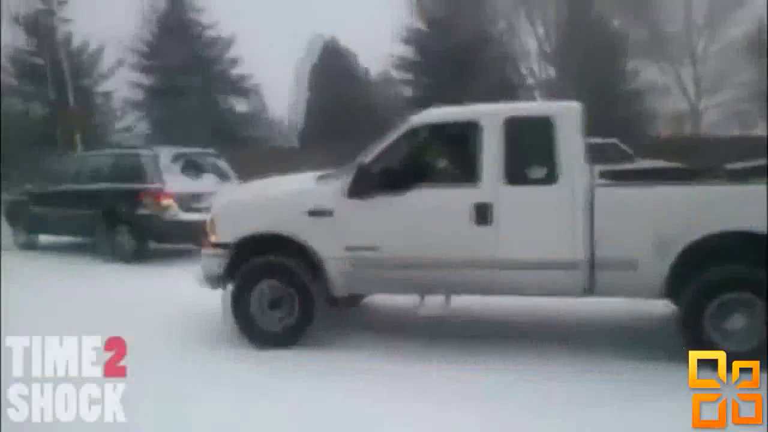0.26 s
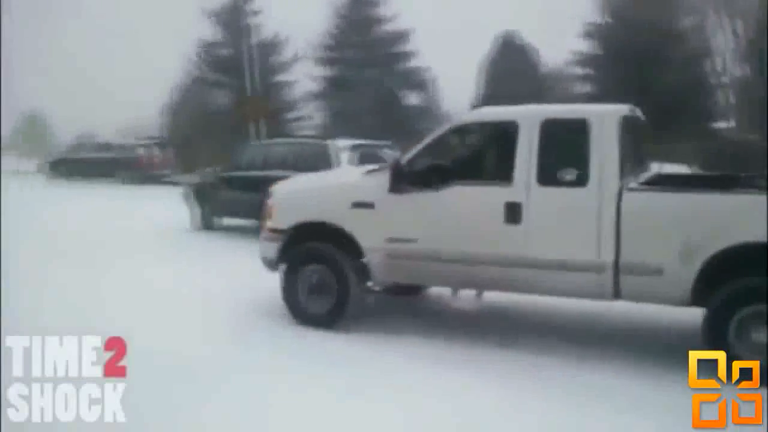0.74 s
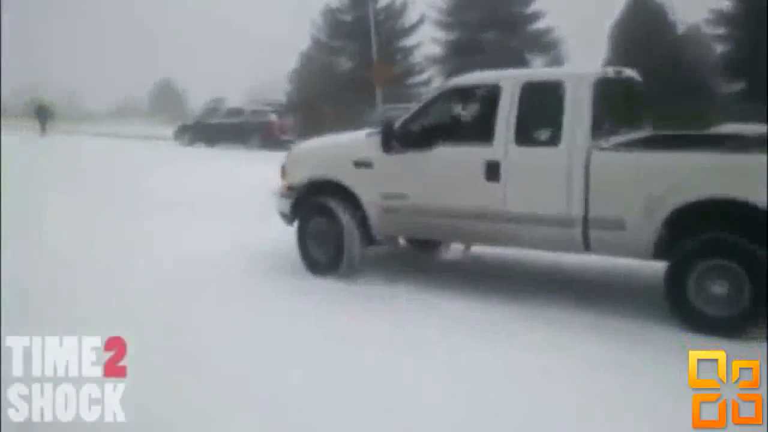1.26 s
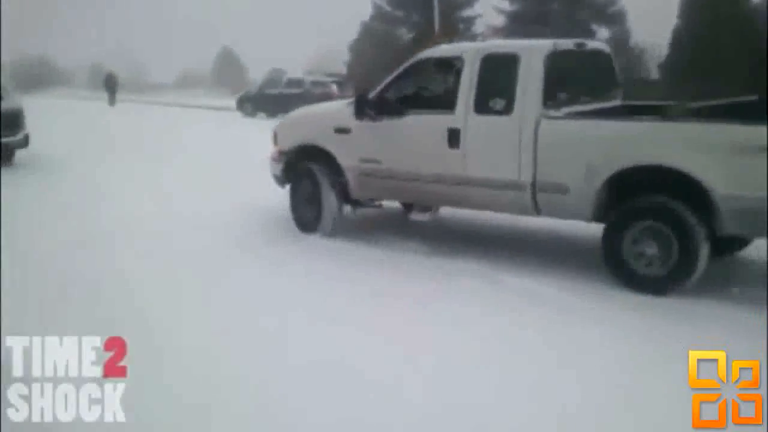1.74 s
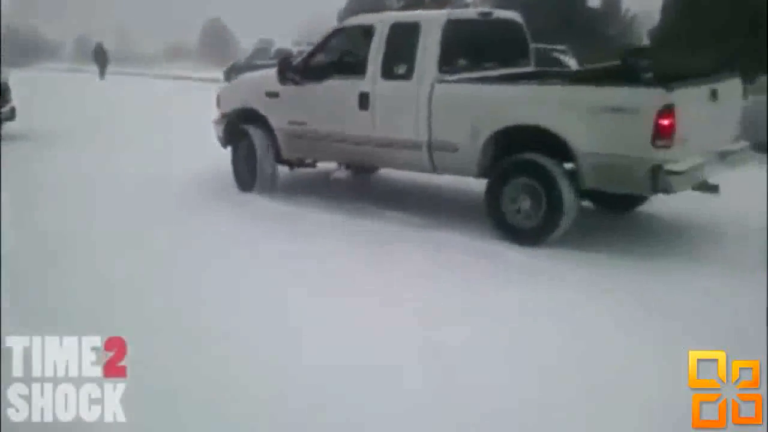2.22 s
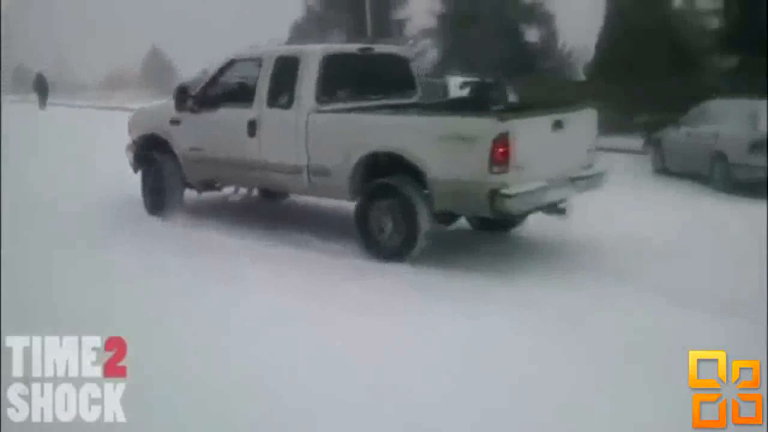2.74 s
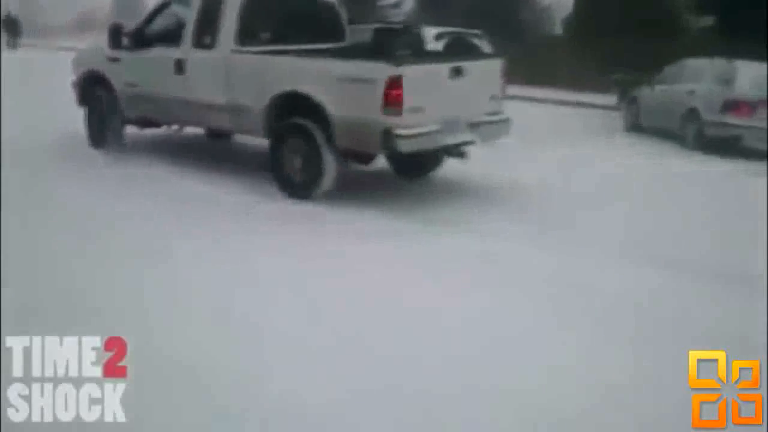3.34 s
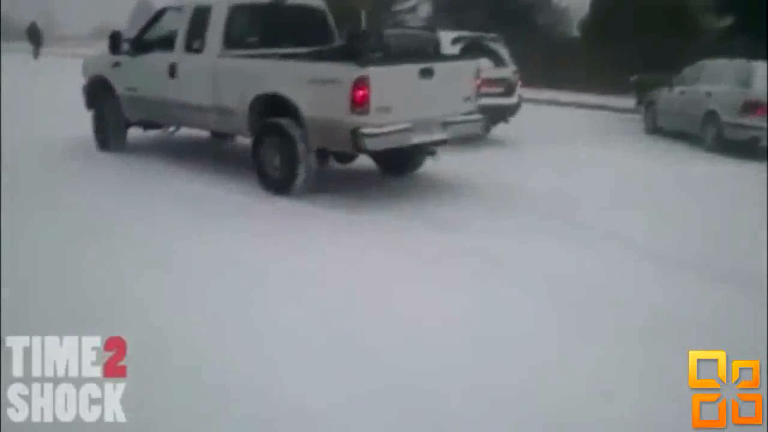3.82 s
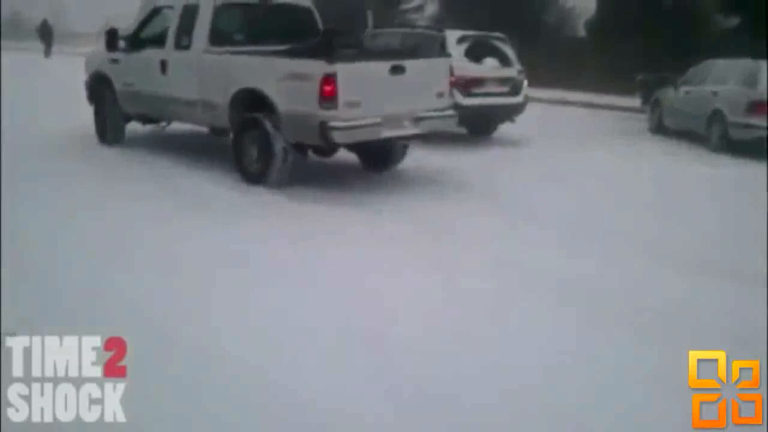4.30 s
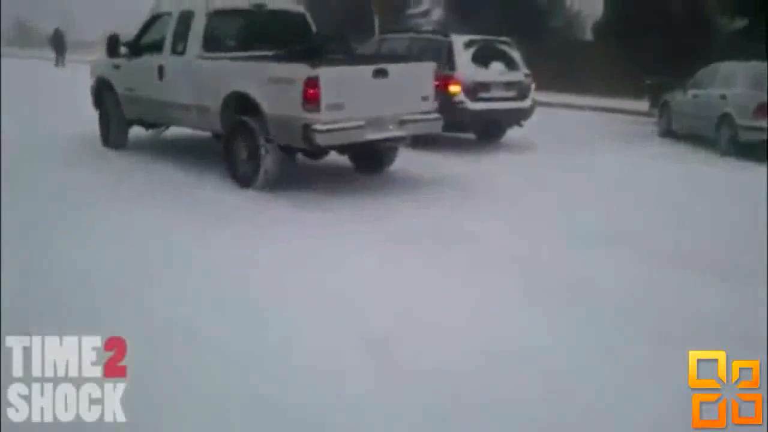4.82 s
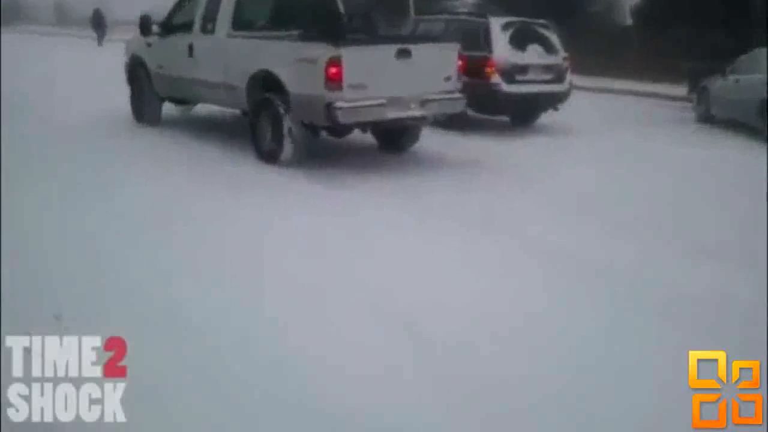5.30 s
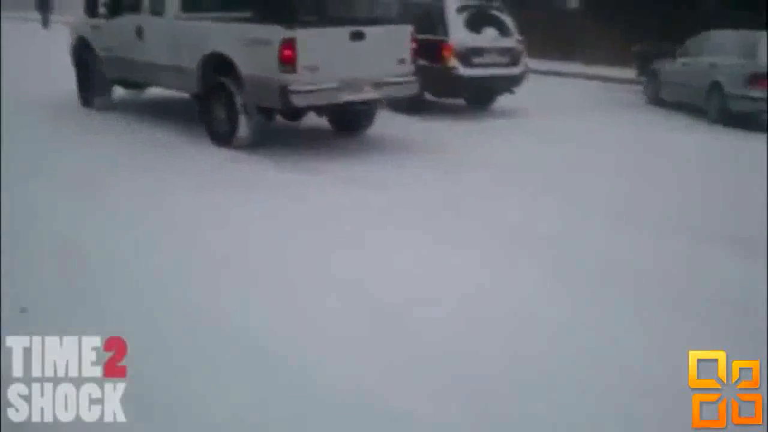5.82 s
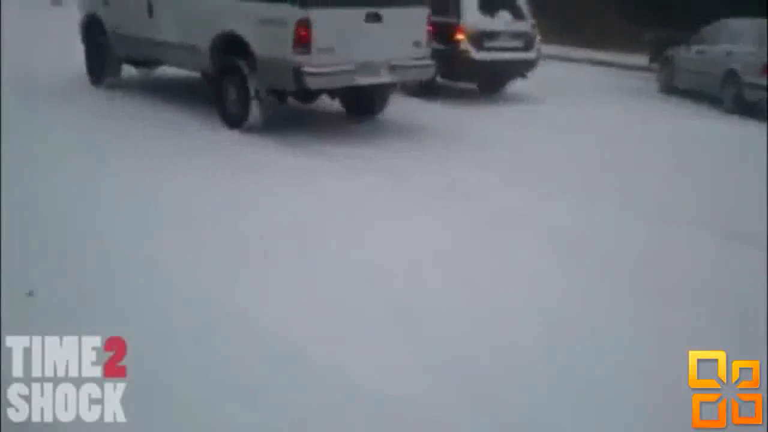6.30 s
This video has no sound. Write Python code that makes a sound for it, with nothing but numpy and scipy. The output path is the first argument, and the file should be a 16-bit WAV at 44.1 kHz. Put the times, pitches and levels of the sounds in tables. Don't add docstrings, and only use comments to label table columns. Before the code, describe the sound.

Outdoors on a snowy street, a diesel pickup clatters close by from the first half second, with a low exhaust hum and thin belt whine. Wind soon thumps and crackles on the small handheld microphone, heaviest around one and a half to two and a half seconds. The engine revs with a turbo whistle near three seconds, eases, then revs once more as the wind dies. Tyres crunch softly and another engine idles behind.

```python
import sys
import numpy as np
from scipy import signal
from scipy.fft import rfft, irfft, next_fast_len
from scipy.io import wavfile
from scipy.ndimage import uniform_filter1d, map_coordinates

SR = 44100
rng = np.random.default_rng(int(sys.argv[2]) if len(sys.argv) > 2 else 0)


def master_out(mix):
    frames = np.transpose(np.atleast_2d(mix))
    ceiling = np.clip(frames, -1, 1)
    pcm = np.round(ceiling * 32767).astype(np.int16)
    wavfile.write(sys.argv[1], SR, pcm)


def boost_factor(decibels):
    exponent = np.asarray(decibels, float) / 20
    return 10 ** exponent


N = 288855
TIME = np.arange(N) / SR
MID_LOAD_DB = -32


def unit(x):
    return x / np.sqrt(np.mean(x ** 2) + 1e-20)


def along(points, hz):
    f, v = np.transpose(points)
    return np.interp(np.log(hz + 1), np.log(f + 1), v)


def curves(rows):
    s, *cols = np.transpose(rows)
    return [np.interp(TIME, s, c) for c in cols]


def wobble(rate):
    knots = rng.standard_normal(int(N * rate / SR) + 4)
    return map_coordinates(knots, [np.arange(N) * rate / SR])


def filtered(x, response):
    m = next_fast_len(N + 8192)
    return irfft(rfft(x, m) * response(np.fft.rfftfreq(m, 1 / SR)), m)[:N]


def noise(spectrum):
    return unit(filtered(rng.standard_normal(N), lambda hz: boost_factor(along(spectrum, hz))))


def resonant(x, modes):
    def response(f):
        total = 0
        for k, (centre, width, db) in enumerate(modes):
            damping = 1j * f * width
            total = total + (-1) ** k * boost_factor(db) * damping / (centre * centre - f * f + damping)
        return total
    return unit(filtered(x, response))


def smooth_field(shape, tall, long):
    field = uniform_filter1d(rng.standard_normal(shape), size=tall, axis=0)
    return unit(uniform_filter1d(field, size=long, axis=1))


def patchy(x, patchy_db, streak_db):
    z = signal.stft(x, nperseg=1024)[2]
    gain_db = patchy_db * smooth_field(z.shape, tall=10, long=5)
    gain_db = gain_db + streak_db * smooth_field(z.shape, tall=2, long=24)
    return unit(signal.istft(z * boost_factor(gain_db), nperseg=1024)[1][:N])


def even(x, span=0.0079):
    power = np.abs(uniform_filter1d(x ** 2, int(span * SR)))
    return unit(x / np.sqrt(power + 0.07))


# (time [s], level [dB])
LOAD = [(.53, -28.5), (.8, -27.5), (1.38, -28.5), (1.8, -36.5), (2.46, -32.5), (2.76, -27), (3.13, -27.5),
        (3.2, -33), (3.56, -37.5), (4.09, -33), (4.55, -39.5), (5.05, -34), (5.28, -27.5), (5.66, -26.5),
        (5.75, -33.5), (6.3, -40.5), (6.46, -37.5), (6.55, -40.5)]
# (time [s], side [0 grille, 1 flank, 2 tail])
TURN = [(.5, 0.6), (1.15, 0.39), (1.5, 0.55), (1.9, 0.8), (2.4, 1), (2.7, 1.2), (2.95, 1.3), (3.2, 1.5),
        (3.35, 1.18), (5.12, 1.12), (5.3, 2.08), (6.55, 1.79)]


def law(base_db, per_load_db, per_turn_db):
    return base_db + per_load_db * (curves(LOAD)[0] - MID_LOAD_DB) + per_turn_db * curves(TURN)[0]


# (frequency [Hz], density [dB per Hz])
RUMBLE = [(20, -43.5), (45, -4.5), (80, -2.5), (130, 3.5), (165, -4.5), (220, -3), (290, -14), (400, -53)]


def rumble():
    away_db_per_s = 0.17
    return boost_factor(law(-41.5, 0.22, -0.3) - away_db_per_s * TIME + 1.0) * noise(RUMBLE)


# (frequency [Hz], width [Hz], level [dB])
DRONES = [(220.5, 14, -5), (435, 12, 1), (500, 12, -1), (560, 14, -3), (629, 14, -5)]


def drones():
    level_db, swing_db = -53, 4
    out = np.zeros(N)
    for mode in DRONES:
        swell = boost_factor(level_db + mode[2] + swing_db * wobble(2.993))
        out += swell * resonant(rng.standard_normal(N), [mode])
    return out


# (time [s], frequency [Hz], level [dB])
IDLER = [(.5, 132.3, -48), (4.58, 124, -62.5), (4.66, 126.8, -39.5), (4.86, 133.1, -40), (4.93, 132.6, -53),
         (5.3, 129.7, -62), (5.75, 132.3, -62), (5.95, 131.9, -39.5), (6.2, 133, -52), (6.4, 125.5, -42),
         (6.55, 129, -31.5)]


def idling_engine():
    hz, db = curves(IDLER)
    phase = 2 * np.pi * np.cumsum(hz * (1 + 0.009 * wobble(7.5))) / SR
    return boost_factor(db - 2.0 + 1.9 * wobble(9.7)) * np.sin(phase)


# (frequency [Hz], density [dB per Hz])
CRUNCH = [(250, -21), (340, 0), (450, -1), (540, -1.5), (700, -8), (830, -5.5), (1000, 0.5), (1400, -40)]


def tyres():
    return boost_factor(law(-40.5, 0.81, -0.42)) * patchy(noise(CRUNCH), patchy_db=0.6, streak_db=1.7)


# (time [s], level [dB])
GUSTS = [(0.551, -43), (.85, -34), (1.2, -43.5), (1.3, -34.5), (1.4, -28), (1.7, -29.5), (1.95, -33),
         (2.03, -32.5), (2.1, -24.5), (2.4, -31), (2.44, -39.5), (2.65, -31), (3.15, -42), (3.5, -43),
         (3.82, -43.5), (4, -34), (4.3, -42.5), (4.75, -78)]
# (centre [s], level [dB], length [s], sharpness [dB])
PUFFS = [(.888, -15.5, 0.0044, -11), (.925, -23.5, .03, -12.5), (1.075, -21.5, 0.043, -9),
         (1.135, -24.5, 0.065, -8), (1.368, -22.5, 0.039, 1), (1.412, -23, 0.018, 0.5),
         (1.325, -26, 0.033, -5), (1.62, -27.5, 0.039, 3), (1.69, -24, 0.017, -6), (1.76, -24, 0.022, -11),
         (1.782, -24, .012, -9.5), (1.86, -22.5, 0.035, -9), (1.905, -23.5, 0.038, -6.5),
         (1.94, -22, 0.021, -16), (2.012, -26, 0.0078, -0.5), (2.16, -19.5, 0.016, -8),
         (2.24, -25, 0.031, -14.5), (2.67, -26, 0.018, -5), (1.465, -21, 0.11, 2.5), (1.55, -22.5, 0.02, 0),
         (1.59, -24.5, .016, 6), (1.665, -21.5, 0.03, -3.5), (1.712, -22.5, 0.03, -9),
         (2.078, -17.5, .022, 0.5), (2.135, -23, 0.044, -1.5), (2.198, -23, 0.02, 1),
         (2.283, -20.5, 0.045, 0), (2.34, -18, 0.026, -6.5), (2.408, -22, 0.028, 2),
         (2.525, -17, 0.043, -9.5), (2.62, -22.5, 0.062, -13.5), (2.824, -22.5, 0.03, -5),
         (3.03, -27, .016, -14), (3.105, -30, .04, -10.5), (3.205, -30, 0.036, -12),
         (3.33, -22, 0.018, -19), (3.418, -27, 0.018, -16), (3.58, -29, .02, -20),
         (3.75, -27.5, .015, -9.5), (4.026, -26, 0.0091, -4), (4.205, -27, 0.017, -15),
         (3.308, -17.5, 0.022, -15), (3.345, -17.5, 0.02, -22.5), (3.558, -21, 0.013, -19.5),
         (3.635, -22, 0.035, -20), (3.725, -25, 0.04, -20.5), (3.872, -17.5, 0.027, -12),
         (3.985, -20, 0.085, -7), (4.097, -25, 0.014, 3.5), (4.55, -28, 0.012, -25.5)]


def eddies():
    rate, over_wind_db, length_s = 55, -1, 0.009
    sharp_db, scatter_db = -8.5, 1.5
    s, strength_db = np.transpose(GUSTS)
    count = int(rate * (s[-1] - s[0]))
    chance = rng.standard_normal((count, 4))
    when = s[0] + (np.arange(count) + .5 + 0.33 * chance[:, 0]) / rate
    level_db = np.interp(when, s, strength_db) + over_wind_db + scatter_db * chance[:, 1]
    lengths = length_s * np.exp(.5 * chance[:, 2])
    return PUFFS + list(zip(when, level_db, lengths, sharp_db + scatter_db * chance[:, 3]))


# (frequency [Hz], density [dB per Hz])
FLUTTER = [(30, -24), (60, -6.5), (150, 10.5), (300, 4), (450, -7.5), (800, -15.5), (1500, -68.5)]
SHARP = [(150, -22), (350, 2.5), (520, -2.5), (800, -9.5), (1100, -19), (1500, -26.5), (2500, -47)]
THUD = [(20, -33), (40, -9.5), (70, 2), (110, -8.5), (150, 4), (300, -52.5)]


def wind():
    flutter_db, = curves(GUSTS)
    thud_db = -42 + 0.3 * (flutter_db - MID_LOAD_DB) + 3 * wobble(7.4)
    calm = np.clip((GUSTS[-1][0] - TIME) / 0.34, 0, 1)
    dull, sharp = np.zeros(N), np.zeros(N)
    t = np.arange(-4000, 4000) / SR
    for s, db, length, sharp_db in eddies():
        bump = boost_factor(db) * np.exp(-(t / (0.48 * length)) ** 2)
        start = round(s * SR) - 4000
        dull[start:][:len(t)] += bump
        sharp[start:][:len(t)] += bump * boost_factor(sharp_db)
    torn = boost_factor(2 * wobble(170))
    dull, sharp = dull * torn, sharp * torn ** 0.79
    lumps_db = 2.2 * wobble(55)
    bed = boost_factor(flutter_db - 2.5 + lumps_db) * even(noise(FLUTTER))
    bed = bed + boost_factor(thud_db + 1.0) * even(noise(THUD), span=0.031)
    return calm * bed + boost_factor(-5.5) * dull * even(noise(FLUTTER)) + boost_factor(-4.5) * sharp * even(noise(SHARP))


# (time [s], peak [dB], frequency [Hz])
SNAPS = [(0.886, -12.5, 330), (0.93, -20, 530), (1.068, -14, 550), (1.083, -20, 200), (1.112, -13.5, 330),
         (1.365, -11.5, 498), (1.41, -11.5, 450), (1.432, -5, 483), (1.469, -2, 300), (1.7, -15, 296),
         (1.579, -16.5, 347), (2.069, -6, 455), (2.1135, -12.5, 550), (2.159, -13.5, 450),
         (2.084, -15, 300), (1.689, -18, 500), (3.93, -19, 350), (3.862, -18.5, 370), (2.197, -25, 290),
         (2.279, -13.5, 797), (2.283, -15, 248), (2.293, -12, 330), (2.337, -16.5, 240), (2.343, -9.5, 297),
         (2.397, -16, 280), (2.415, -18.5, 570), (2.7, -19.5, 280), (1.723, -16.5, 330),
         (1.588, -15.5, 440), (3.3, -20, 150), (3.984, -14, 250), (2.323, -16, 454), (2.313, -16.5, 310),
         (.916, -15.5, 270), (.955, -23.5, 280), (1.096, -18.5, 480), (1.152, -21.5, 300), (.619, -24, 220),
         (1.475, -12.5, 603), (1.45, -7.5, 503), (1.488, -11.5, 510), (2.535, -13, 310), (2.821, -19, 470),
         (2.878, -15.5, 290), (3.345, -24, 220), (3.877, -19.5, 550), (3.6, -18.5, 380),
         (3.968, -11.5, 550), (3.989, -11.5, 570), (4.157, -24, 450), (4.145, -21.5, 400)]


def snaps():
    out, t = np.zeros(N), np.arange(-300, 300) / SR
    for s, db, hz in SNAPS:
        swing = np.exp(-(2.5 * hz * t) ** 2) * np.cos(2 * np.pi * hz * t + .8)
        out[round((s + .0015) * SR) - 300:][:len(t)] += boost_factor(db + 2) * swing
    return out


# (time [s], peak [dB], frequency [Hz])
ICE = [(1.5003, -29.5, 7300), (1.748, -25.5, 6700), (1.9093, -30, 6900), (1.919, -32, 7200),
       (1.6925, -37, 6500), (1.784, -38, 6200), (3.6534, -31, 7150), (3.7524, -38.5, 7430),
       (3.8699, -35, 6570), (4.151, -29, 6950), (4.1781, -38.5, 6370), (4.2175, -39, 6250),
       (4.3502, -29, 7550), (4.5219, -36.5, 6000), (4.5946, -40, 7500), (4.6416, -34.5, 6770),
       (4.6768, -33.5, 7140), (4.721, -35, 5940), (5.3131, -27.5, 6550)]


def ice():
    ring_s = .0004
    out, t = np.zeros(N), np.arange(200) / SR
    for s, db, hz in ICE:
        tick = np.exp(-t / ring_s) * np.sin(2 * np.pi * hz * t)
        out[round((s + .0005) * SR):][:len(t)] += boost_factor(db) * tick
    return filtered(out, lambda hz: boost_factor(along([(1500, -25.0), (4500, 1), (7500, -0.5)], hz)))


# (time [s], level [dB])
BELT = [(.5, -40), (.8, -37), (1.4, -38.5), (1.8, -39), (2.05, -40), (2.3, -47), (3.1, -50), (3.35, -43),
        (3.55, -50), (4.05, -50), (4.2, -43.5), (4.45, -45), (4.7, -48), (5.1, -49), (5.6, -56),
        (6.55, -60)]


def pulley():
    start_hz, sag_hz_per_s, width_hz, drift = 1190, 10, 20, .004
    breath = noise([(1, 0), (width_hz / 2, -3), (width_hz * 2, -30)])
    hz = (start_hz - sag_hz_per_s * TIME) * (1 + drift * wobble(5))
    tone = unit(breath * np.sin(2 * np.pi * np.cumsum(hz) / SR))
    return boost_factor(curves(BELT)[0] + 1.5 * wobble(11)) * tone


# (centre [s], frequency [Hz], level [dB])
PANEL = [
    (.58, 1590, -27),
    (0.664, 1627, -25),
    (.697, 1840, -29),
    (.782, 1820, -24.5),
    (0.869, 1790, -24),
    (.955, 1830, -29),
    (1.035, 1830, -30),
    (1.126, 1820, -27),
    (1.215, 1800, -37),
]


def panel():
    ring_s = 0.019
    out = np.zeros(N)
    for s, hz, db in PANEL:
        out += boost_factor(db) * np.exp(-((TIME - s) / (.5 * ring_s)) ** 2) * np.sin(2 * np.pi * hz * TIME)
    return boost_factor(2.5 * wobble(120)) * out


# (centre [s], length [s], start [Hz], end [Hz], level [dB])
BLIPS = [
    (2.415, 0.027, 4720, 4760, -40),
    (2.54, .02, 4950, 5150, -41),
    (2.61, 0.055, 5100, 5070, -46),
    (2.72, 0.046, 4950, 5070, -44),
    (2.77, .03, 4760, 4920, -41),
    (2.82, 0.067, 5050, 5040, -44),
    (2.89, .03, 5120, 5230, -50),
    (3.0, 0.056, 4790, 4950, -36),
    (3.04, .05, 4770, 4990, -48),
    (3.085, 0.036, 5030, 5300, -39),
]


def whistles():
    out = np.zeros(N)
    for s, length, start_hz, end_hz, db in BLIPS:
        t = TIME - s
        phase = np.pi * t * (start_hz + end_hz + (end_hz - start_hz) * t / length)
        out += boost_factor(db) * np.exp(-(t / (.5 * length)) ** 2) * np.sin(phase)
    return boost_factor(3 * wobble(90)) * out


CYLINDERS = [-5, -8, -6, -9, -4, -8, -7, -10]


def bursts(firings, steady, scatter_db):
    count = firings.astype(int)
    scatter = scatter_db * rng.standard_normal(count[-1] + 1)
    size = boost_factor(np.array(CYLINDERS)[count % len(CYLINDERS)] + scatter[count])
    return rng.standard_normal(N) * (steady + size * np.exp(-3.5 * (firings - count)))


# (frequency [Hz], density [dB per Hz])
INTAKE = [(3240, -32), (5500, -8.5), (5940, -3), (6800, -12), (7710, -20), (10000, -39), (17000, -120)]


def intake():
    hiss = noise([(4500, -49.0)] + INTAKE[1:])
    return boost_factor(law(-57, 1.15, .3)) * patchy(hiss, patchy_db=3.5, streak_db=4.5)


# (frequency [Hz], width [Hz], level [dB])
TURBO = [(4898, 375, 2), (5030, 218, 5.5), (5148, 68, 5.5), (5410, 240, -3.5)]
SPOOLED = [(4950, 300, 0.5), (5154, 240, 6.5), (5337, 180, 5), (5510, 280, -4)]


def turbo(firings, rate):
    level_db = law(-48.5, 0.97, 2.9) + 2.5 * np.log2(rate / 90)
    spin = bursts(firings, steady=.8, scatter_db=2.5)
    spool = np.clip((rate - 100) / (128 - 100), 0, 1)
    sound = np.sqrt(1 - spool) * resonant(spin, TURBO) + np.sqrt(spool) * resonant(spin, SPOOLED)
    return boost_factor(level_db) * patchy(sound, patchy_db=1.3, streak_db=3.0)


# (frequency [Hz], width [Hz], level [dB])
VALVES = [(3110, 286, -1.7), (3510, 300, 1), (3960, 500, 0), (4760, 250, -0.26)]


def rattle(firings):
    sound = resonant(bursts(firings, steady=0.97, scatter_db=3.5), VALVES)
    return boost_factor(law(-44, 0.61, 1)) * patchy(sound, patchy_db=1.0, streak_db=3.0)


# (frequency [Hz], width [Hz], level [dB])
GRILLE = [(1010, 370, -2), (1170, 120, 4.5), (1320, 78, 13), (1548, 77, 11), (1830, 140, 0.5),
          (2260, 350, -5), (2693, 226, 6.5)]
FLANK = [(994, 70, -12.5), (1157, 95, -4), (1503, 246, -2), (1643, 79, 4.5), (1792, 160, -2.5),
         (2248, 403, -5.5), (2880, 290, -13.5)]
TAIL = [(978, 37, 1), (1130, 610, -7), (1438, 66, 5.5), (1585, 77, 3.5), (1990, 235, 2), (2650, 303, -4)]


def knock(firings):
    turn = np.clip(curves(TURN)[0], 0, 2)
    blows = bursts(firings, steady=1.0, scatter_db=-1.0)
    sound = np.zeros(N)
    for k, side in enumerate([GRILLE, FLANK, TAIL]):
        share = np.sqrt(np.clip(1 - np.abs(turn - k), 0, 1))
        sound += share * resonant(blows, side)
    return boost_factor(curves(LOAD)[0]) * patchy(sound, patchy_db=0.67, streak_db=1.26)


# (multiple of the firing rate, level [dB])
EXHAUST = [(0.748, -13), (1, -1.5), (2, -17), (2.6, -23.5), (3, -25)]


def exhaust(firings, tone_db):
    pipe = np.zeros(N)
    for k, db in EXHAUST:
        pipe += boost_factor(db + 0.83 * wobble(5.4)) * np.sin(2 * np.pi * k * firings)
    return boost_factor(tone_db + 3.5) * pipe


# (time [s], rate [firings per s], level [dB])
TRUCK = [(.5, 86, -44), (1.35, 94, -38), (1.8, 96, -62), (2.4, 88, -42), (2.7, 91, -44.5), (2.95, 109, -33),
         (3.2, 128, -37.5), (3.5, 89, -48.5), (4.1, 86, -39), (4.6, 67, -60), (5.03, 92, -41),
         (5.2, 108, -37), (5.41, 123, -37), (5.58, 134, -28.5), (5.72, 133, -35.5), (5.79, 120, -46),
         (5.95, 95, -44), (6.55, 78, -61)]
# (frequency [Hz], gain [dB])
GROUND = [(400, 0), (620, -1), (740, -7), (860, -5), (960, 0), (5200, 0), (6300, -7), (8000, -11)]


def truck():
    rate, tone_db = curves(TRUCK)
    firings = np.cumsum(rate * (1 + .003 * wobble(17))) / SR
    shake = boost_factor(0.096 * wobble(11))
    body = filtered(knock(firings) + rattle(firings), lambda hz: boost_factor(along(GROUND, hz)))
    return shake * (body + turbo(firings, rate) + intake()) + exhaust(firings, tone_db)


def scene():
    street = rumble() + drones() + idling_engine() + tyres()
    air = wind() + snaps() + ice()
    return (street + air + pulley() + panel() + whistles() + truck())[None]


# (frequency [Hz], share of the time lost)
DROPOUT = [(7900, .1), (8300, .45), (8800, .3), (9100, .04), (12000, .05), (13200, .15), (14500, .5),
           (15700, .75)]


def dropouts(x):
    hz, _, z = signal.stft(x, SR, nperseg=1024)
    field = smooth_field(z.shape, tall=12, long=4)
    kept = 1 / (1 + np.exp(-1.7 * field)) > along(DROPOUT, hz)[:, None]
    return signal.istft(z * kept, SR, nperseg=1024)[1][:N]


def top_cut(x):
    return signal.sosfilt(signal.butter(12, 15720, fs=SR, output="sos"), x)


# (frequency [Hz], level [dB])
ABOVE = [(7900, -28), (8700, -37.5), (9000, -37), (10500, -29.5), (11800, -29.5), (11950, -50),
         (12400, -50.5), (13000, -46), (15700, -50.5)]
# (time [s], level [dB])
OVERLOADS = [
    (1.4705, -33),
    (1.5525, -38),
    (1.4265, -44),
    (1.9095, -43),
    (3.9895, -45),
]


def record(dry):
    top_hz, shift_hz, start_s = 7900, 4000, 0.5064
    x = dry[0] / (1 + np.abs(dry[0] / .33) ** 5) ** (1 / 5)
    upper = filtered(x, lambda hz: (hz > top_hz - shift_hz) & (hz < top_hz))
    x = filtered(x, lambda hz: (hz < top_hz) * hz ** 2 / (hz ** 2 + 36 ** 2))
    treble = np.zeros(N)
    for k in (1, 2):
        edge = top_hz + (k - 1) * shift_hz
        moved = 2 * upper * np.cos(2 * np.pi * k * shift_hz * TIME)
        treble = treble + filtered(moved, lambda hz: (hz > edge) * boost_factor(along(ABOVE, hz)))
    cracks = np.zeros(N)
    for s, db in OVERLOADS:
        cracks[round(s * SR)] += boost_factor(db)
    cracks = filtered(cracks, lambda hz: (hz > top_hz) * (top_hz / (hz + 1)) ** 4)
    x = x + dropouts(treble)
    x = x / (1 + np.abs(x / .325) ** 16) ** (1 / 16)
    fade_in = np.clip((TIME - start_s) / .007, 0, 1)
    mix = ((x + cracks) * fade_in)[None]
    return top_cut(mix)


dry = scene()
out = record(dry)
master_out(out)
```